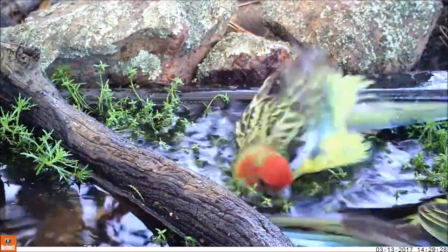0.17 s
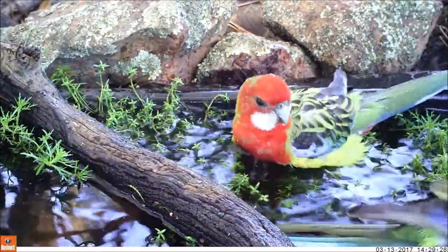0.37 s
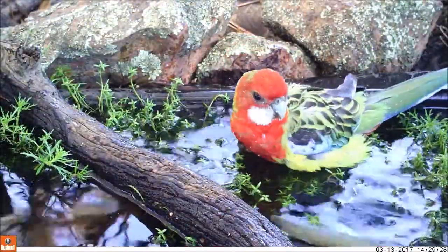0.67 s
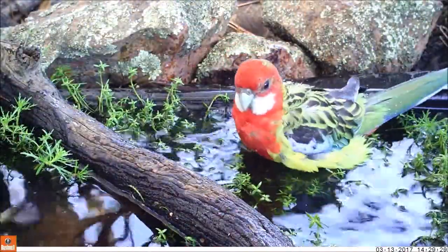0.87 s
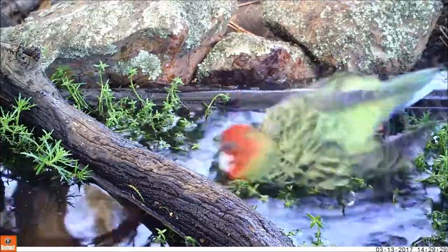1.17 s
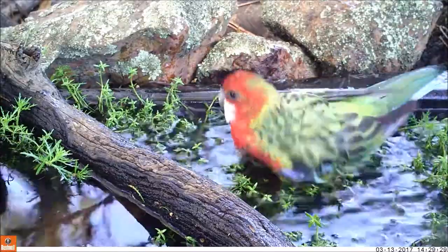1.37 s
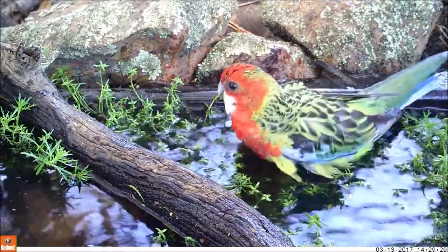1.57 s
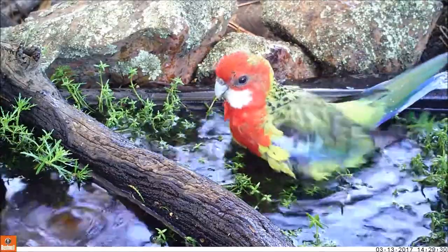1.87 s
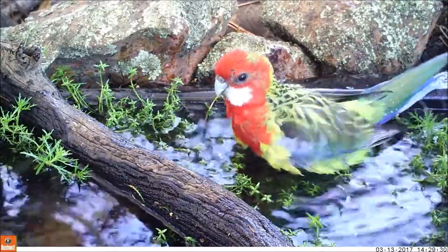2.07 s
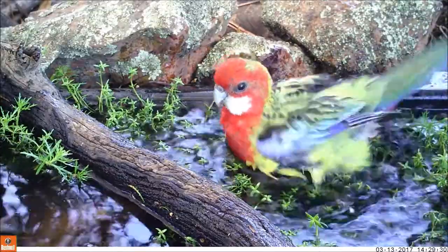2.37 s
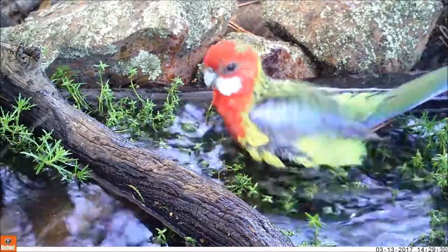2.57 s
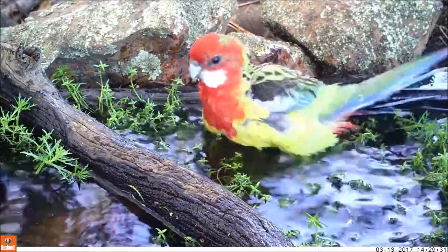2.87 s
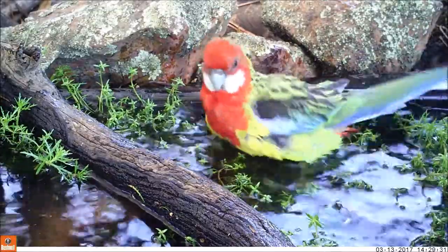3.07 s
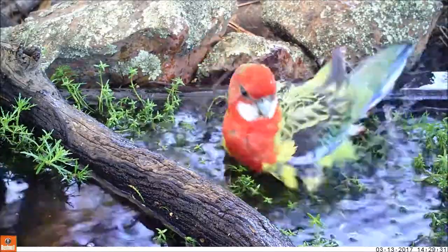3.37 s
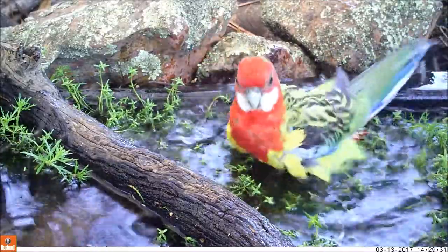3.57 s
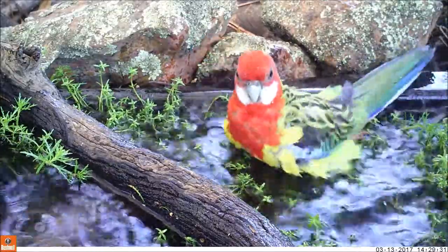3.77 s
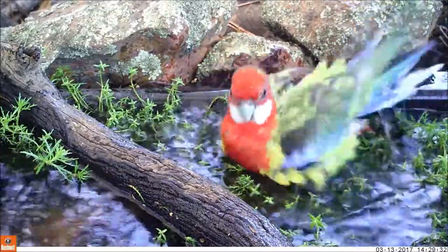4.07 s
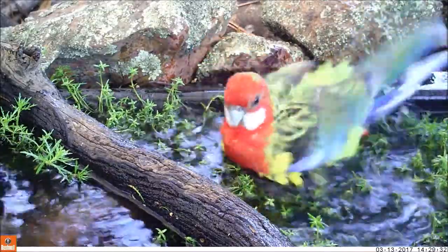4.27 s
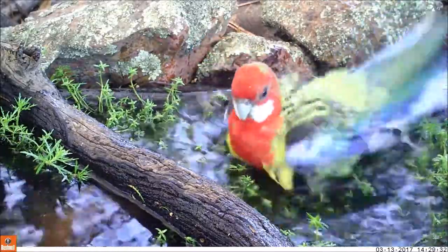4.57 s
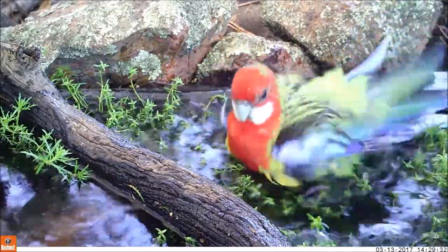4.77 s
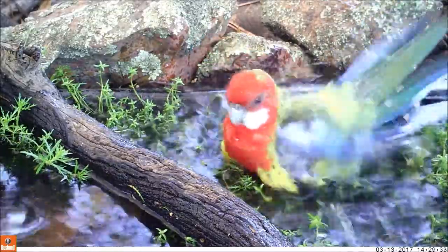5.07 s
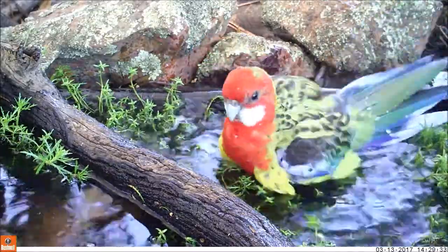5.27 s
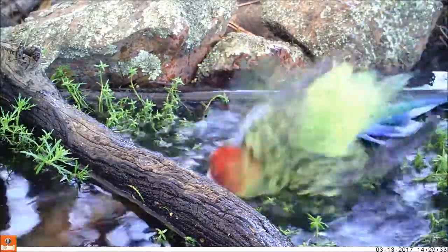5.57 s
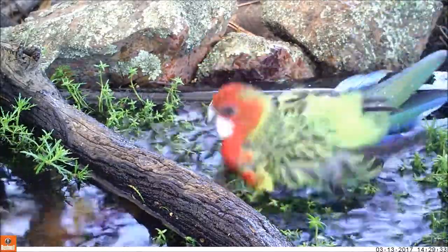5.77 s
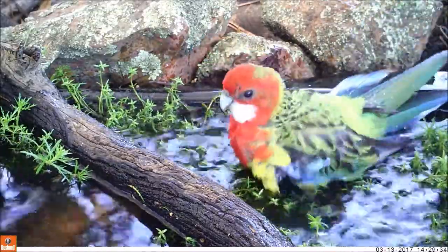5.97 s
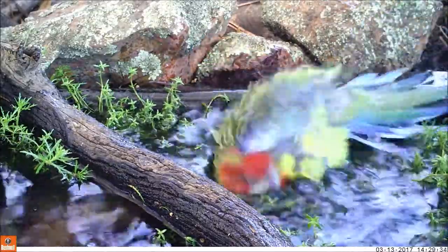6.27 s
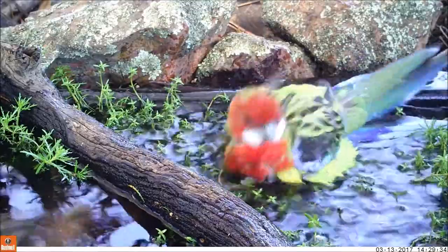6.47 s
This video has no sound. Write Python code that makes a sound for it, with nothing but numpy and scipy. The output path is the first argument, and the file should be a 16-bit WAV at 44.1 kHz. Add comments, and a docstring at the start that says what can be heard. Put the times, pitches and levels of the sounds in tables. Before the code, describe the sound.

Close outdoor view of a parrot bathing in a shallow garden pond. A hurried string of small squeaks opens, then near quiet with a few drips. From about one and a half seconds, rapid wingbeats throw crisp, crackling splashes with plinks and tiny bubbles, pausing briefly and growing sharper toward the end. Wind rumbles low on the microphone over faint hiss; a distant bird whistles thinly at the close.

```python
"""In a shallow garden pond among rocks a parrot bathes, beating its wings about six times a second.
Each beat is a burst of noise, crackling impacts and tiny bubbles; short rings make plinks and larger bubbles.
Squeaky notes of summed harmonics open the scene, and thin pure whistles from further off come near the end.
Slow noise and short swings rumble as wind on the microphone, over a faint, steady outdoor hiss."""
import sys
import numpy as np
from scipy import signal
from scipy.fft import rfft, irfft, next_fast_len
from scipy.io import wavfile
from scipy.ndimage import uniform_filter1d

SR = 44100
rng = np.random.default_rng(int(sys.argv[2]) if len(sys.argv) > 2 else 0)


def persist_wave(psi):
    """Save psi, clipped to +-1, as 16-bit WAV."""
    counts = np.round(np.clip(psi, -1, 1) * 32767).astype(np.int16)
    wavfile.write(sys.argv[1], SR, np.atleast_2d(counts).T)


N = 292823
TIME = np.arange(N) / SR

# tone colour of the fine spray: (frequency [Hz], relative level [dB])
SPRAY_COLOUR = [(4000, -45.5), (6500, -5.5), (8300, -2), (9500, -6.5), (11000, 0), (12300, 6), (13200, 1),
                (14000, -35.5)]
# tone colour of the deep slosh and of smacks: (frequency [Hz], relative level [dB])
SLOSH_COLOUR = [(250, -20.5), (600, -18), (1000, -2.5), (1500, -10), (2100, 3), (2700, 6.5), (3500, -45.5),
                (5500, -7.5)]


def undb(db):
    """Turn decibels into a plain gain."""
    return 10 ** (np.asarray(db) / 20)


def unit(x):
    """Scale a sound to an average (rms) level of 1."""
    return x / np.sqrt(np.mean(x ** 2))


def gain_at(hz, points):
    """Read the gain at a frequency from a (Hz, dB) curve, spaced by pitch as the ear hears it."""
    curve_hz, curve_db = np.transpose(points)
    return undb(np.interp(np.log(np.maximum(hz, 1)), np.log(curve_hz), curve_db))


def colour(x, points):
    """Shape the spectrum with a filter that never acts early, so clicks ring after their onset; rms 1."""
    size = 2 * next_fast_len(N // 2 + SR // 10, real=True)
    gains = gain_at(np.fft.rfftfreq(size, 1 / SR), points)
    # folding the cepstrum (the transform of the log spectrum) onto one side makes the filter causal
    cepstrum = irfft(np.log(gains))
    cepstrum[1:size // 2] *= 2
    cepstrum[size // 2 + 1:] = 0
    response = np.exp(rfft(cepstrum))
    return unit(irfft(rfft(x, size) * response)[:N])


def add(out, s, sound):
    """Mix a sound in at time s, in seconds."""
    start = int(np.clip(s * SR, 0, N - 1))
    out[start:start + len(sound)] += sound[:N - start]


def ring(hz, decay, glide, attack):
    """A dying sine whose pitch climbs by the share glide in each decay time; times in seconds."""
    t = np.arange(int(7 * decay * SR) + 2) / SR
    wave = np.sin(2 * np.pi * hz * t * (1 + glide * t / decay / 2))
    envelope = np.exp(-t / decay) * (1 - np.exp(-t / attack))
    return wave * envelope / envelope.max()


def droplets(rate, spread_db, mist):
    """Random impacts (rate per second), many small and a few large, over a smooth mist; rms 1."""
    sizes = undb(spread_db * np.minimum(rng.exponential(size=N), 4))
    hits = rng.random(N) < rate / SR
    clicks = hits * sizes * rng.choice([-1, 1], N)
    return unit(unit(clicks) + mist * rng.standard_normal(N))


def fizz(low_hz, high_hz, cycles, spread_db, count):
    """A swarm of small bubbles, each dying away over a few cycles of its own pitch; rms 1."""
    out = np.zeros(N)
    for when, bore, size in rng.random((count, 3)):
        hz = low_hz * (high_hz / low_hz) ** bore
        bubble = ring(hz, cycles / hz, glide=0.069, attack=.0001)
        add(out, when * N / SR, undb(spread_db * size ** 3) * bubble)
    return unit(out)


def agitation():
    """Power of patter, fine spray and deep slosh: changing stirring, plus a swell and decay for each beat."""
    # stirring between beats: (time [s], patter level [dB])
    stirring = [(0, -88), (1.1, -82), (1.3, -78), (1.5, -77), (1.72, -70.5), (2.0, -90), (2.7, -70.5),
                (3.1, -75), (4.0, -73), (4.35, -67), (4.5, -71.5), (4.62, -62.5), (5.18, -86), (5.75, -64),
                (5.98, -68), (6.43, -66), (6.64, -63.5)]
    # wing beats and dips of the body; spray and slosh are relative to the patter:
    # (time [s], patter level [dB], decay [s], fine spray [dB], deep slosh [dB])
    beats = [(.223, -55, .005, -13, -14), (.639, -68.5, 0.018, -18, -0.5), (1.553, -64.5, 0.014, -10, -2.5),
             (1.605, -45.5, 0.0072, -13, -10), (1.679, -50.5, 0.008, -5, -5.5),
             (1.952, -53.5, 0.0033, -8, -14), (2.009, -63, 0.089, -7, -7.5),
             (2.18, -53.5, .031, -7.5, -10.5), (2.329, -46.5, 0.026, -5, -19),
             (2.478, -47.5, .045, -4, -11.5), (2.634, -49, 0.058, -4.5, -15), (2.799, -51, 0.054, -9, -15),
             (2.924, -52, 0.037, -10.5, -20), (2.985, -50, 0.0091, -9.5, -12),
             (3.207, -61.5, 0.046, -10, -8.5), (3.264, -43, 0.0037, -20, -13.5),
             (3.354, -49.5, 0.043, -4.5, -13), (3.433, -53, .006, -14, -12), (3.525, -46, 0.034, -5.5, -16),
             (3.681, -44.5, 0.027, -3, -15), (3.84, -48.5, 0.032, -2.5, -13.5),
             (3.996, -42.5, 0.018, -9, -29), (4.202, -56.5, 0.015, -3.5, -4.5),
             (4.369, -44.5, .004, -16, -8.5), (4.553, -52.5, 0.0029, -7, -2), (4.635, -55.5, 0.011, -2, -8),
             (4.662, -53.5, .035, -7, -14), (4.728, -55.5, 0.27, -8, -10.5),
             (5.083, -50.5, 0.0066, -5.5, -7), (5.119, -60, .027, -16.5, -8),
             (5.268, -55, 0.032, -9.5, -10.5), (5.335, -50.5, .026, -5, -11), (5.392, -58, 0.053, -10, -11),
             (5.503, -46, 0.02, -9.5, -13), (5.566, -48.5, 0.02, -25, -7.5), (5.686, -43, 0.005, 1.5, -32),
             (5.714, -55.5, 0.085, -11, -14), (5.86, -40.5, 0.0083, -5, -13), (5.911, -53, 0.013, -11, -7),
             (6.04, -35.5, 0.0053, -7, -10.5), (6.082, -56.5, 0.038, -4, -2.5),
             (6.217, -43, 0.013, -6.5, -26), (6.278, -51, 0.012, -10, -3.5), (6.372, -44.5, .013, -3, -14),
             (6.532, -48, 0.035, -7.5, -14)]
    stir_spray_db, stir_slosh_db = -6.5, -13.5  # relative to the patter
    firm_rise_s, firm_beat_db, rise_halving_db = 0.0064, -47.5, 15

    stir_db = np.interp(TIME, *np.transpose(stirring))
    power = undb(stir_db + np.array([[0], [stir_spray_db], [stir_slosh_db]])) ** 2
    for s, db, decay, spray_db, slosh_db in beats:
        near = slice(max(int((s - .1) * SR), 0), int((s + .6) * SR))
        t = TIME[near] - s
        # harder beats swell faster
        rise = firm_rise_s * 2 ** ((firm_beat_db - db) / rise_halving_db)
        swell = np.exp(np.minimum(t / rise, -t / decay))
        levels = undb(db + np.array([[0], [spray_db], [slosh_db]]))
        power[:, near] += (levels * swell) ** 2
    return power


def splashes():
    """The impacts and bubbles of beaten water make slosh, patter and fine spray."""
    # tone colour of the patter: (frequency [Hz], relative level [dB])
    patter_colour = [(1500, -18.5), (2800, -8), (3600, -10), (4200, 2.5), (4800, -0.5), (5600, -4.5),
                     (7000, -8), (9000, -21.5), (14000, -32.5)]
    settle_s, rain_db, gurgle_db = 0.083, -15, -22  # thrown water falling back; dB relative to its envelope

    patter, spray, slosh = np.sqrt(agitation())
    impacts = droplets(rate=1600, spread_db=3.8, mist=.3)
    tiny = colour(fizz(6000, 13000, cycles=8, spread_db=16, count=2400), SPRAY_COLOUR)
    small = colour(fizz(2800, 7000, cycles=6, spread_db=16, count=1900), patter_colour)
    large = fizz(1300, 3300, cycles=4, spread_db=10, count=1200)
    out = patter * unit(0.93 * colour(impacts, patter_colour) + small)
    out += spray * unit(colour(impacts, SPRAY_COLOUR) + tiny)
    out += slosh * unit(colour(impacts, SLOSH_COLOUR) + 0.49 * large)

    # thrown water keeps raining back and gurgling for a moment after each beat
    settle = 1 / (settle_s * SR)
    airborne = np.sqrt(signal.lfilter([settle], [1, settle - 1], patter ** 2))
    rain = colour(fizz(2600, 6500, cycles=5, spread_db=17, count=480), patter_colour)
    gurgle = fizz(1600, 3800, cycles=5, spread_db=9, count=220)
    return out + airborne * (undb(rain_db) * rain + undb(gurgle_db) * gurgle)


def drops():
    """A hard drop ticks on the surface and rings briefly; a flat slap adds a duller smack."""
    # single hard drops and slaps; the smack is relative to the ring:
    # (time [s], ring peak [dB], ring pitch [Hz], decay [s], smack [dB])
    hard_drops = [(0.2642, -42.5, 6100, .0003, -30), (.6255, -44, 6350, 0.00021, -26),
                  (0.6773, -39.5, 4100, 0.00043, -18), (1.45, -45, 4680, 0.0021, -34),
                  (1.6066, -36, 2230, 0.0013, -13), (1.6798, -38.5, 4430, 0.0013, -20),
                  (2.3295, -33.5, 4160, 0.00022, -13), (2.3335, -33, 4580, 0.00056, -6),
                  (2.4727, -46, 4900, 0.0019, -14), (2.4843, -31.5, 5700, 0.00076, -21),
                  (2.634, -36, 4250, 0.00049, -26), (2.6733, -37, 4560, 0.00098, -18),
                  (2.735, -41, 4700, .0009, -24), (2.748, -31.5, 4940, 0.00029, -34),
                  (2.791, -36.5, 4170, 0.001, -20), (2.8129, -28.5, 4760, 0.00039, -34),
                  (2.9236, -35.5, 4500, 0.0014, -40), (2.9655, -40.5, 4190, 0.002, -10),
                  (3.265, -28, 12200, 0.0004, -33), (3.3659, -36, 4100, 0.00059, -13),
                  (3.5379, -36, 4450, 0.001, -2.5), (3.631, -43.5, 7360, 0.00026, -10),
                  (3.6896, -42, 4630, .0011, -32), (3.8394, -40.5, 6040, .0008, -7),
                  (3.9973, -21.5, 4300, 0.00023, -30), (3.9977, -31.5, 4670, 0.0018, -17),
                  (4.2243, -42.5, 4540, 0.0023, -44), (4.371, -37.5, 4350, 0.0023, -14),
                  (4.475, -42, 4270, 0.002, -37), (4.6355, -36, 4330, 0.00033, -26),
                  (4.6631, -38, 4140, 0.00032, 7), (4.7316, -39.5, 4570, 0.0025, -28),
                  (4.8273, -36, 4660, .0012, -30), (4.9235, -37.5, 4620, 0.0012, -24),
                  (4.942, -47.5, 4300, 0.0017, -36), (5.2687, -41, 4560, 0.0017, -18),
                  (5.3408, -33, 2090, 0.00046, -2), (5.3713, -32, 4280, .001, -25),
                  (5.5026, -31, 4600, 0.00069, -22), (5.5168, -34, 4300, 0.00095, -14),
                  (5.6789, -30, 4680, 0.00061, -29), (5.6886, -43, 4560, 0.00036, -33),
                  (5.859, -28, 4700, 0.00016, -3.5), (6.0415, -15.5, 5070, 0.00048, -46),
                  (6.0866, -39, 4140, 0.0016, -12), (6.2182, -30.5, 4560, 0.0015, -21),
                  (6.366, -39, 4700, .0007, -19), (6.3764, -26, 4730, 0.00044, -10),
                  (6.392, -33, 4230, 0.0032, -35), (6.5309, -28.5, 4330, .0007, -10)]
    # tick relative to the ring for a 1 ms decay; drops that ring longer tick less
    tick_1ms_db, tick_db_per_doubling = -15.5, -3

    out = np.zeros(N)
    hiss = colour(rng.standard_normal(N), SPRAY_COLOUR)
    smack = colour(rng.standard_normal(N), SLOSH_COLOUR)
    for s, db, hz, decay, smack_db in hard_drops:
        plink = ring(min(hz, SR / 3), decay, glide=0.01, attack=.00008)
        span = slice(int(s * SR), int(s * SR) + len(plink))
        tick_db = tick_1ms_db + tick_db_per_doubling * np.log2(decay / 10 ** -3)
        noise = undb(tick_db) * hiss[span] + undb(smack_db) * smack[span]
        impact = noise * np.abs(signal.hilbert(plink))  # the noise follows the outline of the ring
        add(out, s, undb(db) * (plink + impact))
    return out


def bubbles():
    """A trapped bubble rises in pitch as it nears the surface; slow ones glug upward."""
    # larger trapped bubbles: (time [s], peak [dB], starting pitch [Hz], decay [s])
    trapped = [(.191, -60, 970, 0.0028), (0.657, -59, 1880, .0028), (1.559, -47.5, 2380, .001),
               (1.598, -54, 1610, 0.0063), (2.099, -47, 3900, 0.0019), (2.236, -65, 1570, .003),
               (2.273, -66, 2160, .003), (2.564, -58.5, 2600, 0.0023), (2.718, -55.5, 1640, .0028),
               (2.58, -46.5, 3720, .0019), (2.645, -49.5, 2210, .0027), (2.825, -35, 3340, 0.0013),
               (2.867, -49.5, 2820, 0.0022), (2.889, -41, 4170, 0.0025), (3.103, -68, 790, .008),
               (3.275, -60.5, 840, 0.0063), (3.347, -45, 2150, .0011), (3.381, -38, 4050, 0.0011),
               (3.432, -57.5, 1810, .0032), (3.573, -41.5, 2630, 0.00066), (3.713, -49, 4040, 0.0042),
               (3.787, -59, 2450, 0.0046), (3.872, -48.5, 2400, 0.0033), (4.066, -59, 1900, 0.0039),
               (4.522, -64, 1530, 0.0033), (4.601, -55, 2290, 0.0035), (4.76, -54, 2410, 0.0031),
               (4.976, -56, 1780, 0.0044), (4.982, -55.5, 1000, 0.0031), (5.143, -54, 3450, 0.0032),
               (5.375, -53, 2820, 0.0039), (5.396, -51.5, 2730, .0033), (5.563, -40.5, 1490, 0.0016),
               (5.564, -37.5, 1060, 0.0032), (5.774, -42, 2450, 0.002), (5.783, -42.5, 3680, .001),
               (5.891, -56.5, 2250, 0.011), (5.916, -50.5, 780, 0.0019), (6.044, -44, 1760, 0.0035),
               (6.083, -52, 3130, .0029), (6.099, -55.5, 755, 0.0073), (6.126, -54, 1594, 0.0081),
               (6.288, -54.5, 1800, 0.0024)]
    rise_hz_per_s, attack_share = 29000, 0.52  # all climb alike; attack as a share of the decay

    out = np.zeros(N)
    for s, db, hz, decay in trapped:
        glide = rise_hz_per_s * decay / hz
        add(out, s, undb(db) * ring(hz, decay, glide, attack=decay * attack_share))
    return out


def note(rows, waver):
    """Pitch, phase and loudness of one slightly unsteady bird note, from its start to its end."""
    s, hz, db = np.transpose(rows)
    t = np.arange(s[0], s[-1], 1 / SR)
    wobble = unit(uniform_filter1d(rng.standard_normal(SR // 2), size=60))[:len(t)]
    pitch = np.interp(t, s, hz) * (1 + waver * wobble)
    phase = 2 * np.pi * np.cumsum(pitch) / SR
    loudness = undb(np.interp(t, s, db)) * signal.windows.tukey(len(t), .1)  # soft ends
    return pitch, phase, loudness


def squeaks():
    """The harmonics of each squeak slide through a throat resonance, with a little rasp."""
    # squeaky notes, one list each: (time [s], pitch [Hz], level before the throat [dB])
    squeaky_notes = [
        [(0, 1423, -48.5), (.008, 1540, -55)],
        [(.021, 1490, -53), (.025, 1530, -45), (.034, 1496, -50.5), (.043, 1470, -46.5), (.05, 1307, -50),
         (.06, 1248, -53.5), (.075, 1226, -50)],
        [(.073, 1510, -54), (.078, 1970, -45), (.082, 2130, -40.5), (.097, 1890, -45), (.103, 1510, -55),
         (.128, 1270, -59)],
        [(.139, 1280, -59), (.149, 1320, -53), (.155, 1970, -50), (.16, 1980, -46.5), (.169, 1780, -55),
         (.182, 1490, -60)],
        [(.216, 820, -68), (.221, 792, -51), (.234, 1110, -50), (.242, 1196, -53), (.254, 1110, -63)],
    ]
    # one value per note, the last one hoarse: (unsteadiness [share of pitch])
    wavers = [.005, .006, .007, .008, .035]
    # resonance of the throat: (frequency [Hz], gain [dB])
    throat = [(700, -0.5), (1300, 0), (2000, -15.5), (2800, -26), (3500, -6.5), (4200, 3), (4800, 0.5),
              (6200, -8), (7500, -27), (10000, -2), (13000, -22)]

    out = np.zeros(N)
    rasp = colour(rng.standard_normal(N), throat)
    for rows, waver in zip(squeaky_notes, wavers):
        pitch, phase, loudness = note(rows, waver)
        voice = np.zeros(len(phase))
        for k in range(1, 7):
            voice += gain_at(k * pitch, throat) * np.sin(k * phase) / (1 + (k / 2.93) ** 4)
        breath = undb(-22) * rasp[:len(phase)] * (1 + np.cos(phase))  # pulses once per cycle
        add(out, rows[0][0], loudness * (voice + breath))
    # the rock wall behind the pond returns the squeaks once, 22 ms later
    return out + undb(-21) * np.interp(TIME - .022, TIME, out, left=0)


def whistles():
    """A bird further off gives thin, pure whistles: a single sine with a gliding pitch."""
    # one list for each whistle: (time [s], pitch [Hz], level [dB])
    thin_notes = [
        [(6.335, 3950, -80), (6.355, 3990, -50), (6.38, 4180, -74), (6.42, 3970, -57), (6.455, 3890, -55),
         (6.48, 4120, -63)],
        [(6.585, 3940, -58), (6.605, 4060, -57), (6.63, 4450, -54)],
    ]
    out = np.zeros(N)
    for rows in thin_notes:
        _, phase, loudness = note(rows, waver=0.0037)
        add(out, rows[0][0], loudness * np.sin(phase))
    return out


def wind():
    """Gusts swell over a steady breeze and rumble on the microphone; a puff pushes it to and fro briefly."""
    # gusts: (time [s], rumble level [dB], half length [s], buffeting level [dB])
    gusts = [(0.112, -48, 0.038, -72), (1.75, -45, 0.049, -58.5), (2.06, -41, 0.056, -49.5),
             (2.37, -41.5, 0.034, -48.5), (2.492, -43, .02, -41), (2.586, -37.5, 0.033, -44.5),
             (2.696, -39.5, 0.027, -49), (3.064, -43, 0.12, -68), (3.3, -50.5, .15, -60.5),
             (3.74, -45, 0.016, -59), (3.926, -49.5, 0.047, -68), (5.249, -42, 0.044, -50),
             (5.396, -46.5, 0.086, -56), (5.565, -41, 0.022, -58), (5.94, -47.5, 0.043, -51.5),
             (6.348, -51, 0.1, -57)]
    # puffs of air that strike the microphone: (time [s], peak of the swing's outline [dB], pitch [Hz])
    puffs = [(.45, -41, 52.7), (0.669, -40.5, 74.6), (1.222, -37.5, 37), (2.029, -43, 48.4),
             (2.368, -37.5, 87), (2.499, -35, 95), (2.583, -25.5, 93), (2.61, -36, 128), (2.862, -34, 47),
             (5.922, -31.5, 71)]
    # tone colour of the low rumble: (frequency [Hz], relative level [dB])
    rumble_colour = [(8, -1), (18, 6.5), (30, 3), (45, -0.5), (65, -4), (90, -20.5), (150, -55)]
    # tone colour of the buffeting: (frequency [Hz], relative level [dB])
    buffet_colour = [(45, -24.5), (75, 9), (120, 3), (170, -9), (250, -23), (400, -32), (800, -57.5)]
    breeze_rumble_db, breeze_buffet_db = -52.5, -65

    power = undb([[breeze_rumble_db], [breeze_buffet_db]]) ** 2 * np.ones(N)
    for s, rumble_db, half_length, buffet_db in gusts:
        swell = np.exp(-np.minimum(((TIME - s) / half_length) ** 2, 20))
        power += undb([[rumble_db], [buffet_db]]) ** 2 * swell
    rumble, buffet = np.sqrt(power)
    out = rumble * colour(rng.standard_normal(N), rumble_colour)
    out += buffet * colour(rng.standard_normal(N), buffet_colour)

    for s, db, hz in puffs:
        turns = np.arange(-2, 2, hz / SR)
        swing = np.cos(2 * np.pi * (turns + rng.random()))
        add(out, s - 2 / hz, undb(db) * swing * np.exp(-(turns / 0.34) ** 2))
    return out


def air():
    """The faint outdoor hiss is steady noise with a fixed tone colour."""
    # tone colour of the hiss: (frequency [Hz], relative level [dB])
    hiss_colour = [(90, -19.5), (150, 3), (330, -4.5), (700, -12.5), (1600, -21), (3500, -25), (4300, -14),
                   (5200, -26), (7500, -32.5), (9500, -33.5), (11300, -25.5), (12450, -21), (13000, -29),
                   (14000, -39.5)]
    return undb(-67.5) * colour(rng.standard_normal(N), hiss_colour)


def rocks(x, echo_db, decay):
    """The stones round the pond scatter a short, faint echo: a dying burst of random reflections."""
    t = TIME[:SR // 4]
    scatter = rng.standard_normal(len(t)) * np.exp(-t / decay) * (t > .002)
    echo = signal.fftconvolve(x, scatter / np.linalg.norm(scatter))[:N]
    return x + undb(echo_db) * echo


def scene():
    """Water and birds among the rocks, with wind and a steady hiss."""
    water = splashes() + drops() + bubbles()
    near = rocks(water + squeaks() + whistles(), echo_db=-12, decay=0.0089)
    return (near + wind() + air())[None]


def record(dry):
    """A steep low-pass filter cuts the top of the treble, above 13500 Hz."""
    low_pass = signal.ellip(8, .2, 60, 13500, fs=SR, output="sos")
    return signal.sosfilt(low_pass, dry)


dry = scene()
out = record(dry)
persist_wave(out)
```